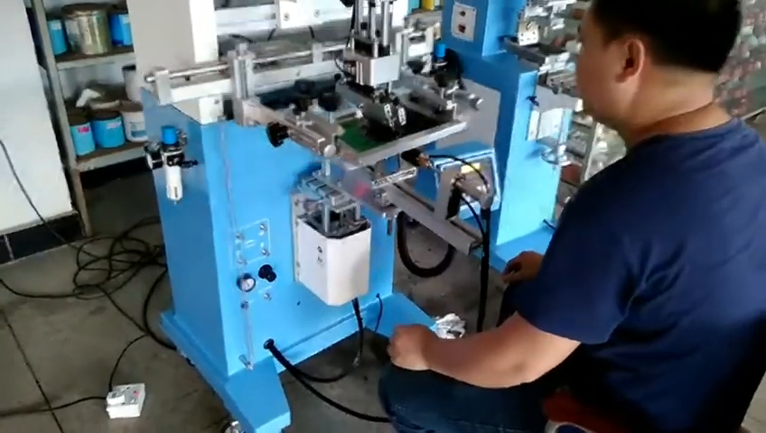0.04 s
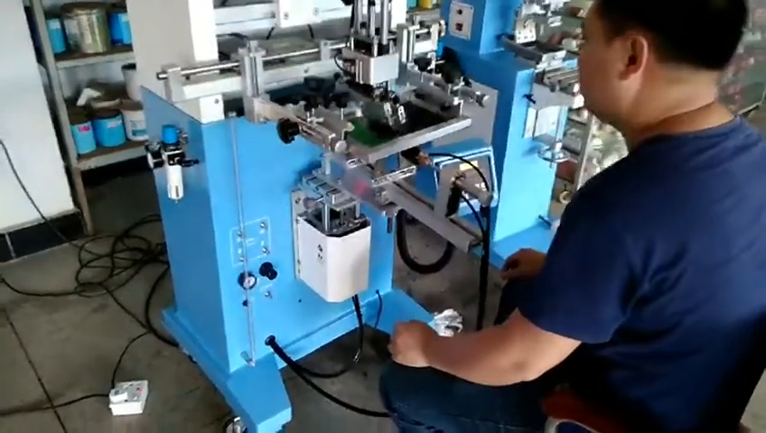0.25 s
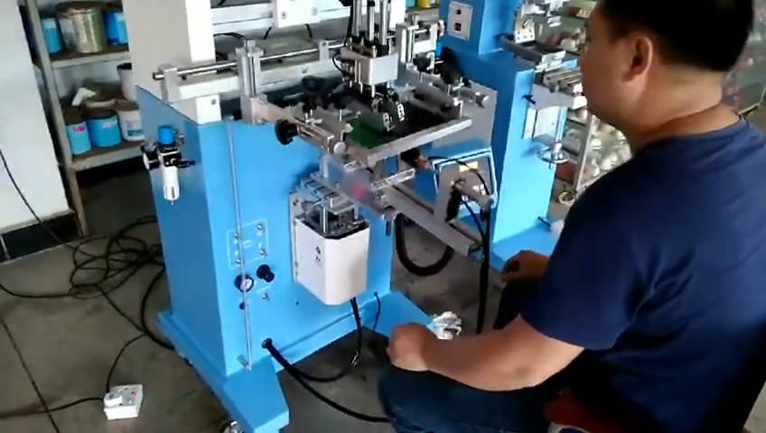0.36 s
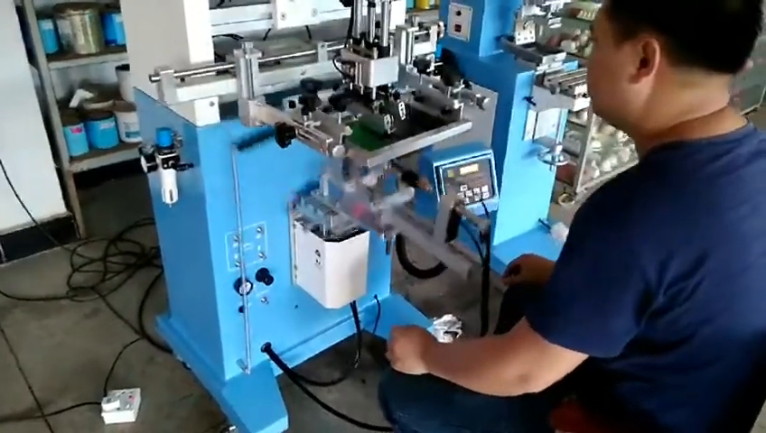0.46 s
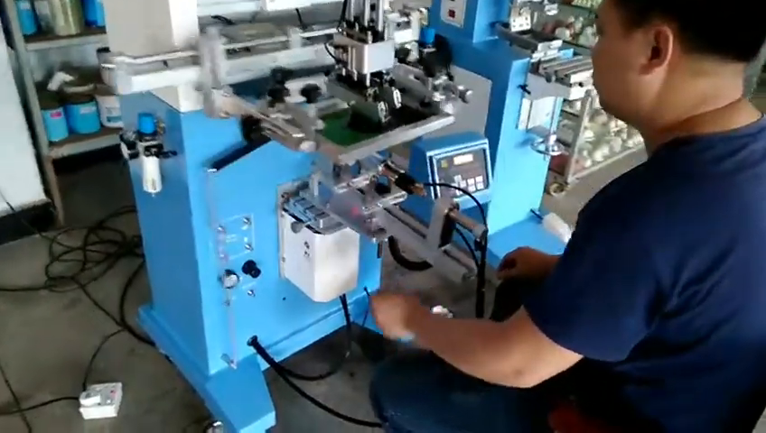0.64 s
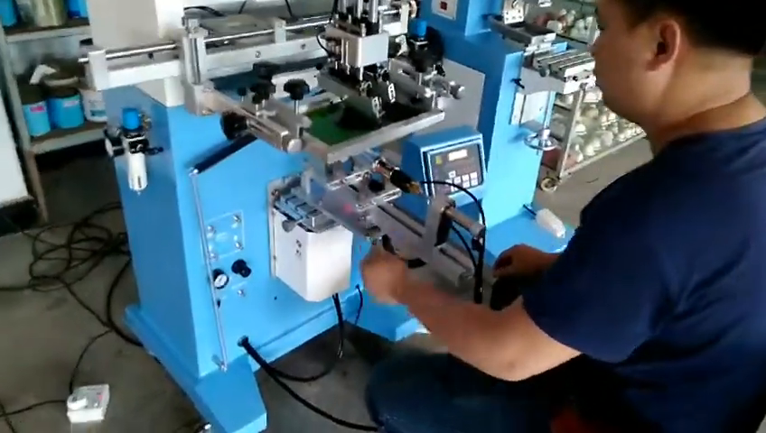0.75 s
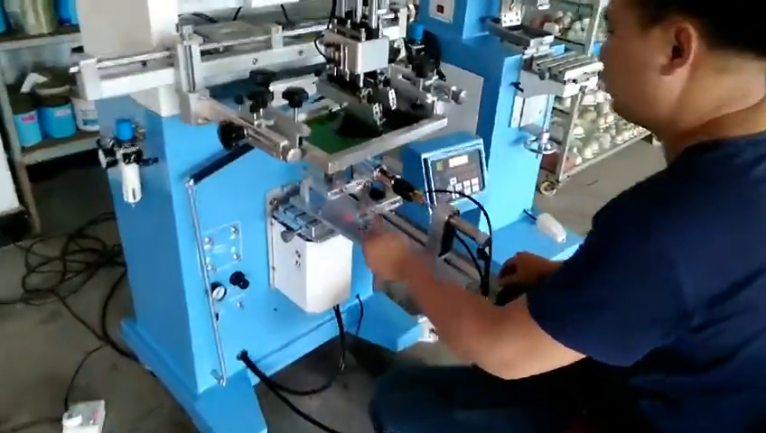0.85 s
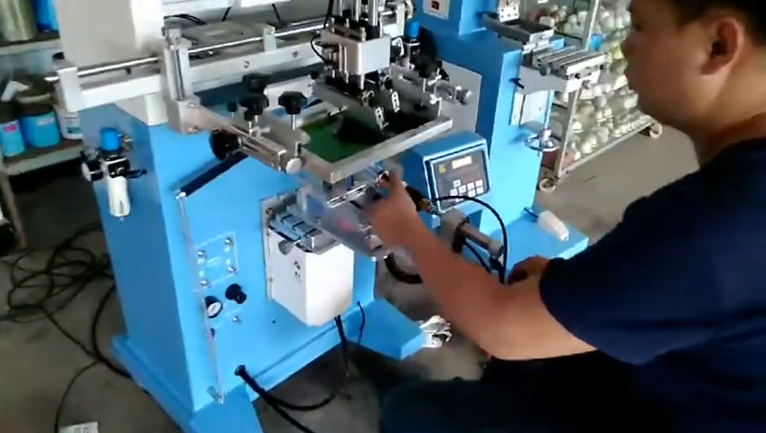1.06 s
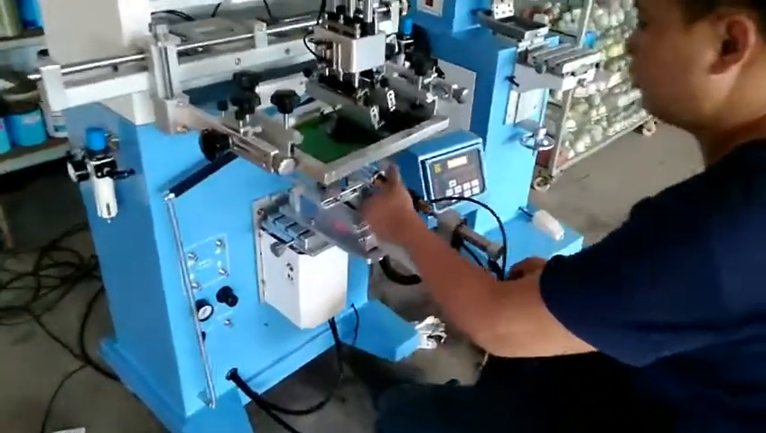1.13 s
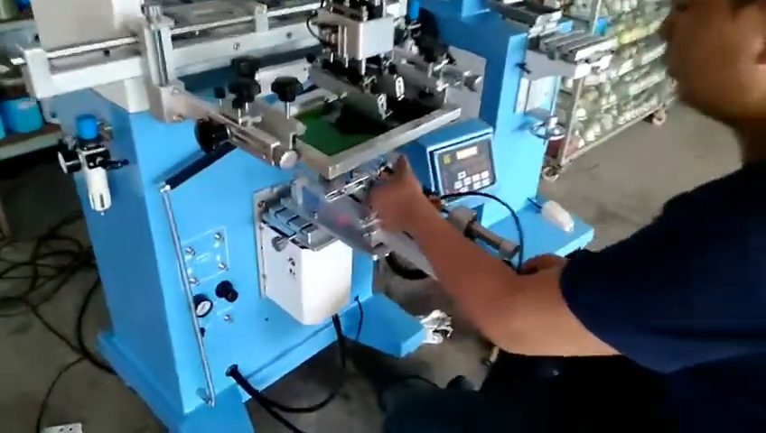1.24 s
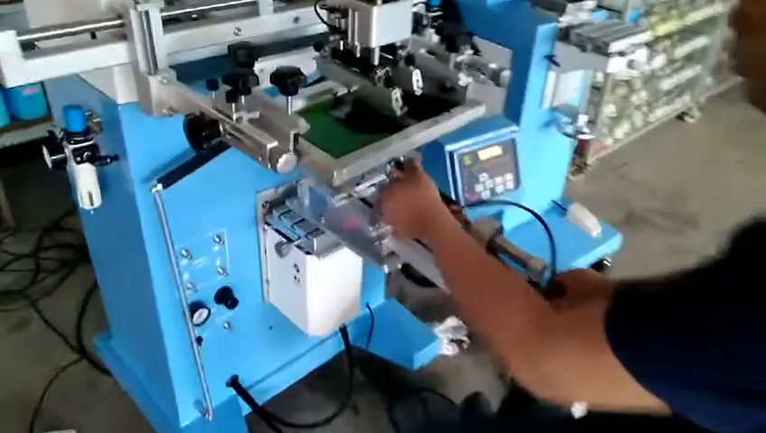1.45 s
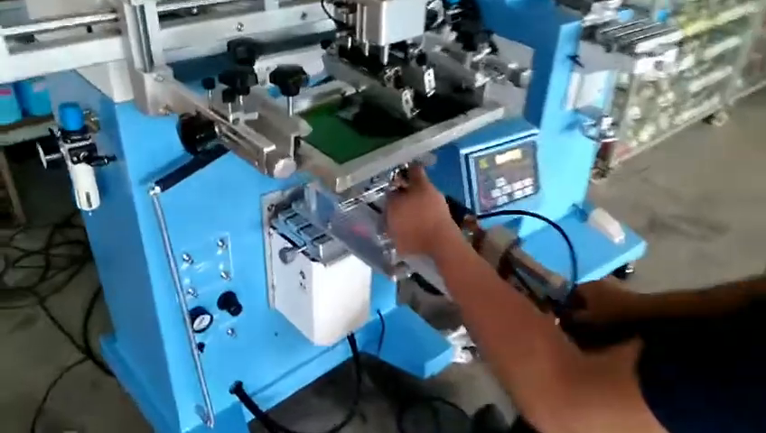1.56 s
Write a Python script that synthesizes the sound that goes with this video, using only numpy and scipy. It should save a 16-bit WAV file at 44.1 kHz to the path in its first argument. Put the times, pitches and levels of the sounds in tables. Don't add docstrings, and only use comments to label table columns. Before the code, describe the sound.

A pneumatic machine puffs out two sharp bursts of air while its frame thuds and rumbles

```python
import sys
import numpy as np
from scipy import signal
from scipy.io import wavfile
from scipy.ndimage import uniform_filter1d

SR = 44100
rng = np.random.default_rng(int(sys.argv[2]) if len(sys.argv) > 2 else 0)


def master(y):
    cut = np.clip(np.atleast_2d(y).T, -1, 1)
    pcm = np.round(cut * 32767)
    wavfile.write(sys.argv[1], SR, pcm.astype(np.int16))


def gain_from_db(level_db):
    decades = np.asarray(level_db, float) / 20
    return 10 ** decades


N = 70560
T = np.arange(N) / SR

# [f/Hz, lean/dB]
ROOM_SPECTRUM = [(30, -76), (85, -7), (300, -12), (600, -19.5), (2600, -21), (6500, -33), (12300, -32.5),
                 (15700, -33)]
ROOM_LEAN = [(60, -1.1), (380, -0.94), (2380, -0.14), (15000, 0.037)]
# [f/Hz, correlation]
LIKENESS = [(60, 1), (300, 0.9), (700, 0.34), (1500, 0), (8000, 0.0072)]
# [t/s, level/dB, f/Hz, length/s]
BUZZES = [(0.01, -63.5, 1115, 0.083), (0.128, -55, 800, 0.022), (0.133, -63, 1460, 0.037),
          (0.169, -58, 1470, 0.037), (0.258, -56, 1530, 0.023), (0.258, -68, 2600, 0.025),
          (0.376, -51.5, 462, 0.047), (0.475, -51, 611, 0.039), (0.687, -56, 776, 0.034),
          (0.708, -57, 4020, 0.019), (0.743, -52, 750, 0.023), (0.794, -55, 930, 0.061),
          (0.776, -61, 2630, 0.11), (1.58, -67, 737, 0.064)]
# [f/Hz, lean/dB]
RATTLE_SPECTRUM = [(450, -22), (750, -9), (1000, -19.5), (1500, -16.5), (2050, -25.5), (2600, -18.5),
                   (3300, -37), (4500, -32.5)]
RATTLE_LEAN = [(500, -3), (1000, -4), (3000, 2.5)]
# [t/s, rumble level/dB, then relative to it boom/dB, panel/dB, rattle/dB]
SHAKE = [(0.0, -62, -21, 3.5, -23), (0.094, -65, -10, 11.5, -6.5), (0.242, -43.5, 32, 2, -23.5),
         (0.318, -36, 14, -11, -36.5), (0.394, -43, 26, -19, -26), (0.466, -41.5, 1, 6.5, -20),
         (0.56, -48, 2.5, -0.5, -19), (0.654, -43.5, -10.5, -1, -32), (0.688, -30, -4, -12, -30),
         (0.796, -34.5, 2, -1, -31.5), (0.818, -32.5, 0, -6, -31), (0.93, -44, 0.5, -9.5, -28),
         (1.1, -64, 3.5, -2, -17.5), (1.3, -74, -4, -1, 1)]
# [f/Hz, level/dB, t60/s]
FRAME_MODES = [(121.4, -2.5, 0.089), (161, -1.5, 0.21), (203.9, 0, 0.15), (240, -1, 0.095)]
BOOM_MODES = [(43.3, -19.5, 0.1), (69.7, -11, 0.39), (86.8, -5.5, 0.35)]
PANEL_MODES = [(280, -1.5, 0.16), (332.2, 1.5, 0.096), (394.4, -4, 0.13), (441.5, -16.5, 0.051)]
COVER_MODES = [(592, -6, 0.2), (704, -8, 0.17), (800, -10, 0.043)]
# [t/s, f/Hz, level/dB]
HUM = [
    (0.17, 83.8, -45),
    (0.214, 85.3, -31.5),
    (0.287, 84.5, -26.5),
    (0.33, 85, -33.5),
    (0.365, 85.7, -49),
    (0.39, 83.8, -26.5),
    (0.43, 85, -37),
    (0.46, 77, -32),
]
# [t/s, peak level/dB, struck near f/Hz, clack relative to peak/dB]
KNOCKS = [(.124, -53, 756, 2), (0.204, -34, 333, -35), (0.236, -30, 407, -16), (0.25, -32, 58, -40),
          (0.264, -30.5, 286, -13), (0.303, -27.5, 236, -22), (0.345, -34, 161, -7),
          (0.439, -32, 59.8, -40), (.455, -25, 384, -12), (0.483, -37.5, 337, -25),
          (0.533, -33.5, 445, -33), (0.619, -44, 352, -25), (0.667, -33.5, 216, -24),
          (0.685, -27.5, 161, -34), (0.711, -32, 110, -30), (0.754, -23.5, 204, -36),
          (0.789, -32.5, 235, -34), (0.817, -27, 203, -40), (0.842, -38, 99, -31), (0.866, -34, 87, -39),
          (0.916, -33, 207, -37.5), (0.957, -53, 78, -35), (0.99, -42.5, 280, -35), (1.015, -40.5, 74, -35),
          (1.047, -41, 197, -34), (1.058, -45, 337, -40), (1.2, -41, 83.4, -30), (1.39, -51.5, 89, -12)]
# [open t/s, close t/s, level/dB, sag/(dB/s), release/(dB/s)]
VENTS = [
    (0.342, 0.481, -37, 62, 293),
    (.664, 0.822, -44, 41, 338),
]
# [f/Hz, level/dB]
FIRST_JET = [(3000, -44), (6500, -10), (7900, -13.5), (9200, -13), (9800, -11), (12800, -0.5),
             (14500, -7.5), (15900, -6.5)]
SECOND_JET = [(1800, -39), (2600, -9.5), (4400, -13.5), (5300, -5.5), (8600, 1), (13000, 2), (14500, -18),
              (15700, -12)]
# [f/Hz, lean/dB]
FIRST_LEAN = [(60, -2.0), (180, -1.5), (550, -0.5), (1650, 7), (4970, 2), (15000, -3.5)]
SECOND_LEAN = [(60, -2.0), (180, -1.5), (550, -6), (1650, -22), (4970, 10), (15000, -5)]
DULL_SAG = [894, 709]
# [f/Hz, share]
FIRST_DULL_SHARE = [(3000, 0.011), (4500, 0.052), (7500, 0.37), (9000, 0.76), (10500, 0), (12000, 0.095)]
SECOND_DULL_SHARE = [(3000, 0), (4500, 0.28), (5500, 0.44), (7500, 0.84), (9500, 0.78), (11500, 0)]
# [f/Hz, width/Hz, level/dB]
HOSE = [(7640, 98, -84), (8590, 31, -59.5), (9560, 40, -52.5), (10780, 100, -54), (12000, 110, -53),
        (12300, 460, -59)]
# [t/s, peak level/dB, decay/s]
SPURTS = [
    (.245, -69.5, 0.11),
    (.304, -67, 0.022),
    (.452, -39, 0.0057),
    (0.552, -59, 0.042),
    (.73, -58, 0.0064),
    (0.816, -45, 0.0051),
    (0.845, -54.5, 0.026),
    (0.982, -62, 0.019),
]
# [f/Hz, width/Hz, share removed]
NOTCHES = [(4650, 300, .7), (9150, 350, .9)]


def rms_one(x):
    return x / np.sqrt(np.mean(x ** 2) + 1e-20)


def in_time(rows):
    s, *columns = np.transpose(rows)
    return [np.interp(T, s, c) for c in columns]


def at_hz(points, hz):
    f, value = np.transpose(points)
    return np.interp(np.log(hz), np.log(f), value)


def lean_gain(db):
    return gain_from_db(db / 2 * np.array([[1], [-1]]))


def burst(start, rise_s, decay_s):
    age = T - start
    return np.clip(age / rise_s, 0, 1) * np.exp(-np.maximum(age, 0) / decay_s)


def drift(rate):
    r = np.exp(-80 * np.pi * rate / SR)
    slow = signal.lfilter([1], [1, -2 * r, r * r], rng.standard_normal(N // 40 + 2002))
    slow = rms_one(slow[2000:])
    return np.interp(np.arange(N) / 40, np.arange(len(slow)), slow)


def ring(clicks, hz, t60):
    r, w = gain_from_db(-60 / (t60 * SR)), 2 * np.pi * hz / SR
    return signal.lfilter([0, np.sin(w)], [1, -2 * r * np.cos(w), r * r], clicks + 1e-18)


def whistle(hz, width):
    r = np.exp(-np.pi * width / SR)
    poles = [1, -2 * r * np.cos(2 * np.pi * hz / SR), r * r]
    return rms_one(signal.lfilter([1, 0, -1], poles, rng.standard_normal((2, N))))


def notch(x, hz, width, share):
    return x - share * signal.lfilter(*signal.iirpeak(hz, hz / width, fs=SR), x)


def bands(spectrum, patchy_db, lean=((1, 0), (2, 0)), sag_db=0 * T, share=FIRST_DULL_SHARE):
    lowest, highest = spectrum[0][0], spectrum[-1][0]
    edges = lowest * 2 ** np.arange(0, np.log2(highest / lowest) + .2, 1 / 4)
    out, power = 0, 0
    together = drift(7.6)
    white = rng.standard_normal((2, 2, N))
    for k, (low, high) in enumerate(zip(edges, np.minimum(edges[1:], 17000))):
        band = signal.butter(3, [low, high], "band", fs=SR, output="sos")
        mid, side = signal.sosfilt(band, white[k % 2])
        hz = np.sqrt(low * high)
        alike = np.clip(at_hz(LIKENESS, hz), -1, 1)
        db = at_hz(spectrum, hz)
        power += gain_from_db(2 * db) * (high - low) * 4 / SR
        flicker_db = patchy_db * (0.94 * together + drift(29.0))
        gain = gain_from_db(db + flicker_db - sag_db * at_hz(share, hz))
        stereo = np.sqrt(1 + alike) * mid + np.sqrt(1 - alike) * side * [[1], [-1]]
        out = out + gain * stereo * lean_gain(at_hz(lean, hz))
    return out / np.sqrt(power)


def room():
    return gain_from_db(-61.5) * bands(ROOM_SPECTRUM, patchy_db=0.68, lean=ROOM_LEAN)


def buzzes():
    out = 0
    for s, db, hz, length in BUZZES:
        swell = np.exp(-(2 * (T - s) / length) ** 2)
        out = out + gain_from_db(db) * swell * whistle(hz, 0.09 * hz)
    return out


def rattle(rumble_db, rattle_db, clack):
    effort = gain_from_db(rumble_db + rattle_db + 6 - 60 * np.maximum(T - 1.0, 0))
    return (effort + clack) * bands(RATTLE_SPECTRUM, patchy_db=3.0, lean=RATTLE_LEAN)


def shaken(modes, level_db):
    jolts_per_s, jolt_spread_db, even_s, even_share = 250, 7, .04, .8
    out = 0
    for hz, db, t60 in modes:
        when = rng.random(N) < jolts_per_s / SR
        size_db = jolt_spread_db * np.minimum(rng.exponential(1, N), 4)
        jolts = when * gain_from_db(size_db) * rng.choice([-1, 1], N)
        out = out + gain_from_db(db) * rms_one(ring(jolts, hz, t60))
    size = int(even_s * SR)
    swing = uniform_filter1d(uniform_filter1d(rms_one(out) ** 2, size), size) + 0.008
    return gain_from_db(level_db) * rms_one(out / swing ** (even_share / 2))


def hum():
    hz, db = in_time(HUM)
    since_start = T - HUM[0][0] + 0.028
    until_end = HUM[-1][0] + 0.021 - T
    gate = np.clip(np.minimum(since_start, until_end) / 0.057, 0, 1)
    return np.sqrt(2) * gate * gain_from_db(db) * np.sin(2 * np.pi * np.cumsum(hz) / SR)


def knocks():
    contact_hz, reach_db_per_octave = 820, 22.5
    s, db, near_hz, _ = np.transpose(KNOCKS)
    thud = 0
    for hz, mode_db, t60 in BOOM_MODES + FRAME_MODES + PANEL_MODES + COVER_MODES:
        clicks = np.zeros(N)
        octaves = abs(np.log2(hz / near_hz))
        clicks[(s * SR).astype(int)] = gain_from_db(db - 4.5 - reach_db_per_octave * octaves ** 0.73)
        thud = thud + ring(clicks, hz, 0.96 * t60)
    soft = np.exp(-2 * np.pi * contact_hz / SR)
    thud = signal.lfilter([(1 - soft) ** 2], [1, -2 * soft, soft ** 2], thud)
    clack = sum(gain_from_db(d + c - 17.5) * burst(t, 0.002, 0.017) for t, d, _, c in KNOCKS)
    return thud, clack


def machine_body(thud, rumble_db, boom_db, panel_db):
    base_db = rumble_db - 150 * np.maximum(T - 1.22, 0)
    humming = (T > HUM[0][0]) & (T < HUM[-1][0])
    quiet_db = uniform_filter1d(-22. * humming, size=1500)
    body = hum() + thud
    body = body + shaken(FRAME_MODES, base_db - 1.5)
    body = body + shaken(PANEL_MODES, base_db + panel_db - 0.5)
    body = body + shaken(BOOM_MODES, base_db + boom_db - 0.5 + quiet_db)
    delayed_slope = np.roll(np.diff(body, prepend=0) * 30, 900)
    side = gain_from_db(-17.5) * (signal.hilbert(body).imag + .5 * delayed_slope)
    return (body + side * [[1], [-1]]) * lean_gain(-1.4)


def seal_leaks():
    spurt = sum(gain_from_db(db) * burst(s, 0.001, decay) for s, db, decay in SPURTS)
    bright = [p for p in FIRST_JET if p[0] > 6500]
    leak = gain_from_db(-82) * np.clip((T - 1.5) / 0.051, 0, 1) * whistle(12100, 900)
    return spurt * bands(bright, patchy_db=-2.0, lean=FIRST_LEAN) + leak


def vent(opens, closes, db, sag, release):
    age, after = np.maximum(T - opens, 0), np.maximum(T - closes, 0)
    rise = 1 - np.exp(-(age / .008) ** 2)
    fall = gain_from_db(-release * after) + gain_from_db(-8.5 - 114 * after)
    return rise * gain_from_db(db - sag * age) * fall


def jet(row, spectrum, lean, dull, share):
    sag_db = dull * np.maximum(T - row[0], 0) ** 2
    return vent(*row) * bands(spectrum, patchy_db=1.0, lean=lean, sag_db=sag_db, share=share)


def exhausts():
    first, second = VENTS
    out = jet(first, FIRST_JET, FIRST_LEAN, DULL_SAG[0], FIRST_DULL_SHARE)
    out = out + jet(second, SECOND_JET, SECOND_LEAN, DULL_SAG[1], SECOND_DULL_SHARE)
    lower_edge = signal.butter(18, 7750, "high", fs=SR, output="sos")
    above_edge = signal.sosfilt(lower_edge, out) + gain_from_db(-20) * out
    notched = notch(out, 14900, 500, .95)
    out = np.where(T < second[0], above_edge, notched)
    singing = sum(gain_from_db(db + 44.5) * whistle(hz, width) for hz, width, db in HOSE)
    return out + vent(*second) * singing


def scene():
    rumble_db, boom_db, panel_db, rattle_db = in_time(SHAKE)
    thud, clack = knocks()
    body = machine_body(thud, rumble_db, boom_db, panel_db)
    loose = rattle(rumble_db, rattle_db, clack) + buzzes()
    air = seal_leaks() + exhausts()
    return room() + loose + body + air


def low_pass(x):
    return signal.sosfilt(signal.butter(12, 15810, fs=SR, output="sos"), x)


def record(dry):
    mix = signal.sosfilt(signal.butter(4, 38, "high", fs=SR, output="sos"), dry)
    for row in NOTCHES:
        mix = notch(mix, *row)
    mix = signal.sosfilt(signal.cheby2(30, 70, 15900, fs=SR, output="sos"), mix)
    return low_pass(mix)


dry = scene()
out = record(dry)
master(out)
```